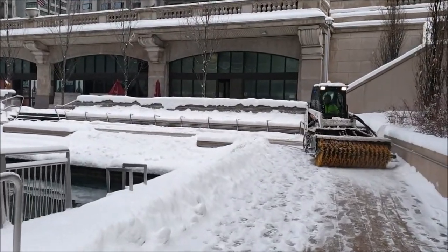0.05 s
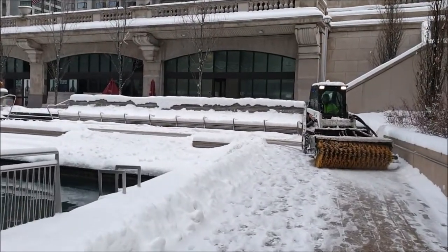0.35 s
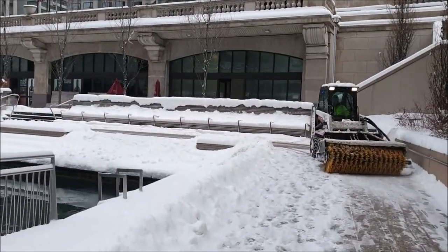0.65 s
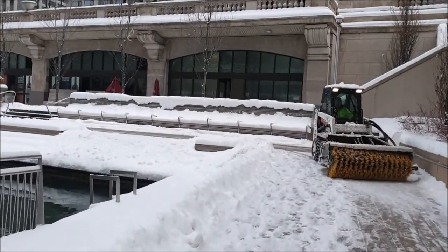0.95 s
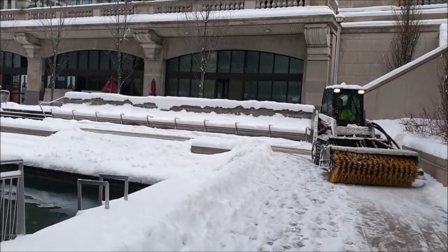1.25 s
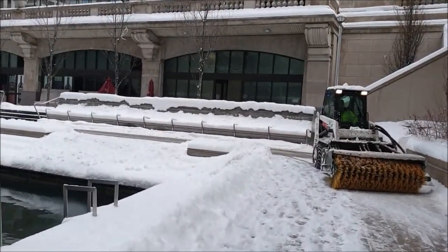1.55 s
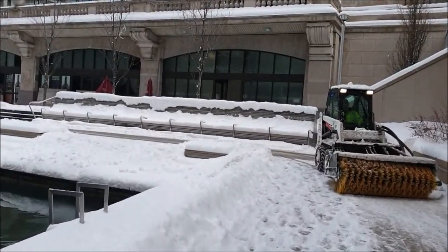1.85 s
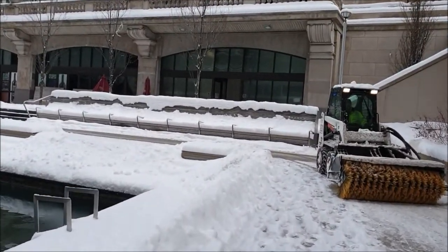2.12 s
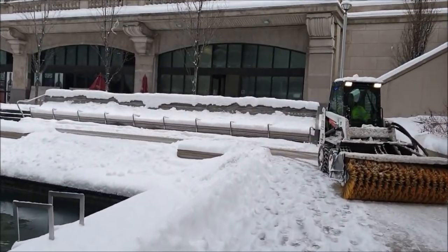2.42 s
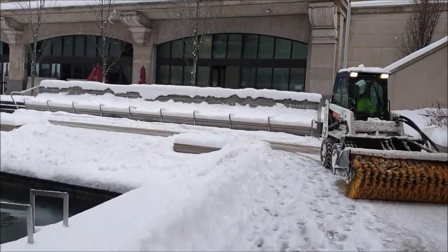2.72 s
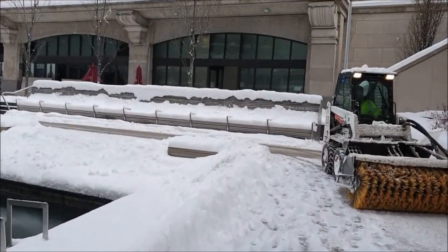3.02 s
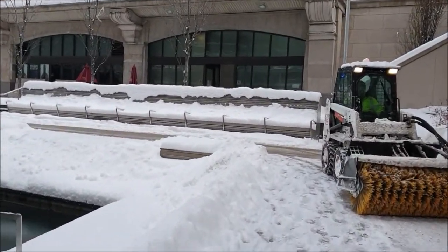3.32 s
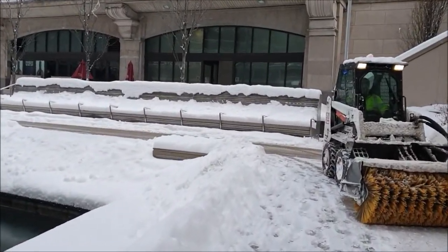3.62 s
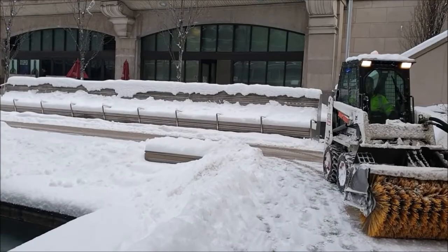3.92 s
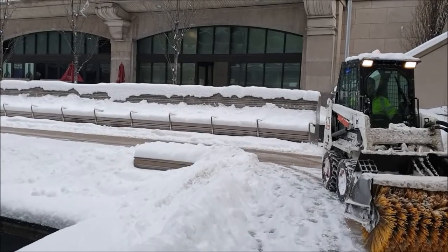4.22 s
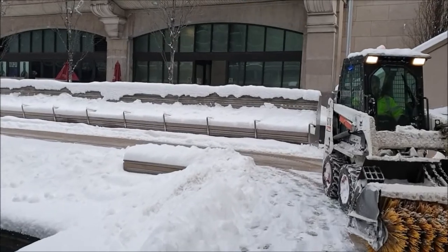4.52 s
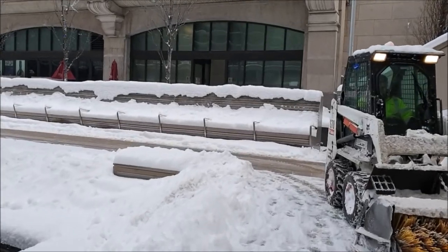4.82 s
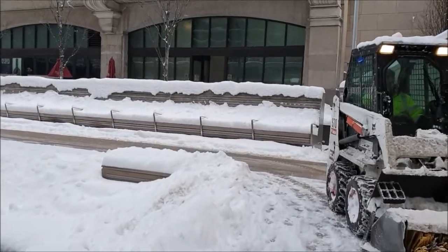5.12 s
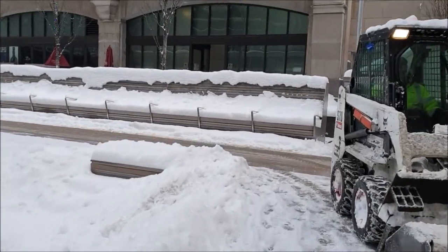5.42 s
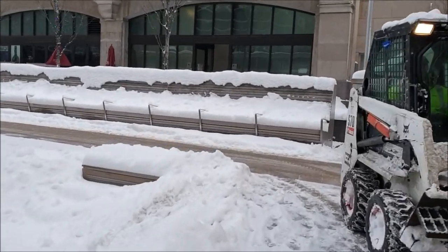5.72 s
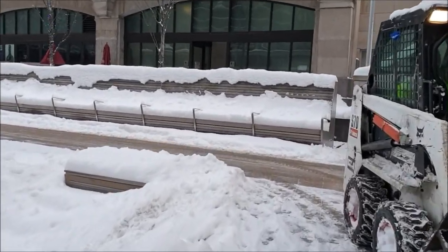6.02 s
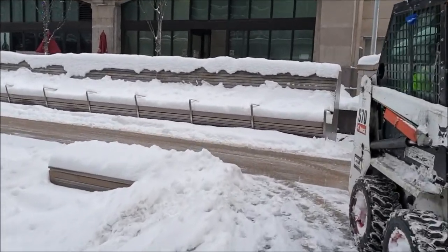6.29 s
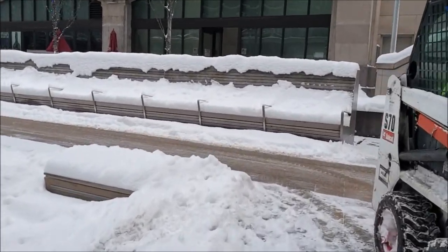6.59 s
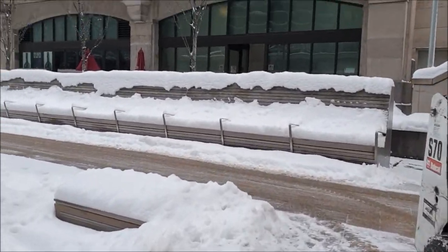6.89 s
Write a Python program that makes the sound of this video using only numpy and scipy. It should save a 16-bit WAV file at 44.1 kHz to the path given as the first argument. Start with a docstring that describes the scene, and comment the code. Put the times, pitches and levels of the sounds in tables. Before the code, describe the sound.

A small diesel loader runs at constant speed on a snowy outdoor walkway, with a low drone, fast knocking clatter and a thin hydraulic whine. Its rotary broom hisses over the paving in uneven surges, flicking bits of grit, and rasps across ice midway. The machine grows gradually louder as it nears the microphone, slightly to the right, and its tyres crunch snow at the end.

```python
"""A diesel drones and clatters, slowly coming closer: a small three-cylinder loader sweeping a snowy walkway.
Firings pulse in the exhaust, one cylinder knocks once a cycle, and a hydraulic pump whines along.
The rotary broom hisses over the paving, flings grit and scrapes ice. Tyres crunch the snow as the
machine draws almost level on the right. A stone front answers the knock."""
import sys
import numpy as np
from scipy import signal
from scipy.fft import rfft, irfft, next_fast_len
from scipy.io import wavfile
from scipy.ndimage import map_coordinates

SR = 44100
rng = np.random.default_rng(int(sys.argv[2]) if len(sys.argv) > 2 else 0)


def store_pcm(level_fs):
    """Save levels as 16-bit WAV."""
    pcm = np.round(np.clip(level_fs, -1, 1) * 32767).astype(np.int16)
    wavfile.write(sys.argv[1], SR, np.atleast_2d(pcm).T)


N = 315315

# the drone swells and fades among the walls: (time [s], firing tone [dB], its octave [dB])
DRONE_LEVELS = [(0.0, -49, -34), (0.04, -33, -29.5), (0.77, -30.5, -26), (1.05, -31.5, -25.5),
                (1.74, -24, -25.5), (2.19, -22, -24.5), (2.89, -21, -24), (3.68, -20, -27),
                (5.04, -18.5, -26), (5.91, -20.5, -27.5), (6.64, -24.5, -19.5), (7.1, -27.5, -17.5)]
# upper drone: (time [s], third harmonic [dB], fourth harmonic [dB])
OVERTONE_LEVELS = [(0.2, -66, -62), (0.25, -71, -64), (0.98, -45, -48), (1.59, -50, -57),
                   (2.11, -44.5, -52), (2.26, -45, -70), (2.83, -44, -49), (3.75, -58, -52.5),
                   (3.79, -62, -64), (4.47, -43, -51), (5.79, -40.5, -61), (6.36, -39.5, -45),
                   (7.01, -47, -52), (7.05, -55, -45)]
# lope of unequal cylinders, between the firing tones: (order [per cycle], level [dB])
LOPE_TONES = [(4, -43.5), (5, -44), (7, -53.5), (8, -73)]
# gas turbulence: (frequency [Hz], relative level [dB])
RUMBLE_EQ = [(12, -9), (28, -12.5), (52, 2.5), (75, 2.5), (150, -0.5), (210, -3.5), (300, -10.5),
             (450, -18.5), (1000, -50)]
def exhaust(cycle):
    """Three firings a cycle make the drone; uneven cylinders and gas turbulence roughen it."""
    firing_db, octave_db = curves(DRONE_LEVELS)
    firing = 3 * cycle
    drone = amp(firing_db) * tone(firing, waver_db=0, drift=.006, rate=10)
    drone += amp(octave_db) * tone(2 * firing, waver_db=-.2, drift=.012, rate=5.9)
    for harmonic, db in zip((3, 4), curves(OVERTONE_LEVELS)):
        drone += amp(db) * tone(harmonic * firing, waver_db=.8, drift=.1, rate=12)
    # the uneven pressure peaks a twelfth of a cycle ahead of a firing
    lope = sum(amp(db) * tone(order * (cycle + 1 / 12), waver_db=.5, drift=.32, rate=5.7)
               for order, db in LOPE_TONES)
    return drone + lope + amp(-37.5) * rush(RUMBLE_EQ)


# low chug, hard clatter and bright valve rattle, each (frequency [Hz], relative level [dB])
BODY_EQ = [(150, -12), (280, -2), (400, -4), (650, 0.5), (850, -2.5), (1100, -14), (1500, -8), (2200, -37),
           (4000, -62)]
CLATTER_EQ = [(600, -29), (1100, 1), (1340, -1.5), (1600, 0.5), (1900, 0), (2350, -6.5), (2950, -7.5),
              (3600, -12.5), (6000, -23), (12000, -45)]
VALVE_EQ = [(1150, -55), (1550, -4), (1900, -8), (2600, 1.5), (3000, -1), (3900, -5), (6000, -17),
            (12000, -44)]
def combustion(cycle):
    """Each firing throws a burst of noise; valves and injectors rattle alike in every cycle."""
    pulse = np.cos(2 * np.pi * 3 * cycle)
    body = carried("body") * rush(BODY_EQ, amp(.54 * pulse))
    clatter = carried("clatter") * rush(CLATTER_EQ, amp(.93 * pulse + wobble(160)))
    pattern = rng.standard_normal(SR // 26)  # about one cycle of noise
    looped = map_coordinates(pattern, [cycle % 1 * len(pattern)], mode="grid-wrap")
    rattle = filtered(looped * amp(1.8 * pulse), lambda hz: amp(along(VALVE_EQ, hz)))
    return body + clatter + carried("valves") * unit(rattle)


# piston-struck block, side panel and loose cover, each (frequency [Hz], width [Hz], relative level [dB])
BLOCK_MODES = [(590, 110, -5.5), (881, 120, 0.5)]
PANEL_MODES = [(862, 34, -1.5), (920, 57, -7), (992.3, 26, 5.5)]
COVER_MODES = [(1317, 146, 1.5), (1430, 160, -3), (2610, 120, -15)]
SLAP_LEAD, PANEL_LEAD, COVER_LAG = 0.0902, 0.1485, 0.038  # against the first firing [cycles]
def cylinder_knock(cycle):
    """One cylinder hits hardest: it slaps the block, rings a side panel and shakes a loose cover."""
    slap = carried("slap") * knocks(cycle + SLAP_LEAD, BLOCK_MODES, scatter_db=1.5, jitter_ms=.2)
    ring = carried("panel") * knocks(cycle + PANEL_LEAD, PANEL_MODES, scatter_db=3.5, jitter_ms=.11)
    shake = carried("cover") * knocks(cycle - COVER_LAG, COVER_MODES, scatter_db=2.2, jitter_ms=1.2)
    return slap + ring + shake


# housing hum: (order [per cycle, played rounded], front level [dB], side level [dB])
HOUSING_TONES = [(13, -69.5, -49), (15, -60.5, -52), (16, -96, -45), (18, -54, -52), (20, -61, -46),
                 (21, -71.5, -44.5), (22, -64, -50), (24, -71.5, -46.5), (25, -67, -48.5), (28, -58, -55),
                 (30, -66, -61), (31, -64, -49), (33, -62, -53), (34, -86, -47), (36, -57, -43.5),
                 (39, -69.5, -70), (40, -85, -59), (44, -63, -60), (45, -60, -67), (51, -57.5, -62),
                 (52, -60.5, -48.5), (54, -76, -56), (59, -69, -53.5), (60, -74, -48), (63.4, -84, -56),
                 (81.5, -69, -50), (100.7, -65.5, -56)]
def housing(cycle, flank):
    """The housing radiates engine orders, differently to the front and to the side."""
    hum = np.zeros(N)
    for order, front_db, side_db in HOUSING_TONES:
        gain = amp(front_db + flank * (side_db - front_db))
        hum += gain * tone(round(order) * cycle + rng.random(), waver_db=2.5, drift=.34, rate=6)
    return hum


# fader ride of the pump whine: (time [s], level [dB])
WHINE_LEVELS = [(0.15, -49), (0.52, -51), (0.59, -48.5), (1.54, -50), (1.62, -42.5), (2.57, -48),
                (4.39, -47.5), (4.43, -42.5), (5.72, -41.5), (6.32, -36.5), (6.98, -44.5), (7.1, -40)]
# the valve whistles louder: (start [s], length [s], level [dB])
WHISTLE_SWELLS = [(6.74, .16, -46.5), (7.08, .12, -46)]
def hydraulics(cycle, flank):
    """The pump whines in step with the engine, a second whine opens to the side, a valve whistles."""
    pump = amp(curves(WHINE_LEVELS)[0]) * tone(27.165 * cycle, waver_db=1.6, drift=.25, rate=18)
    side_whine = amp(-70.5 + 22 * flank) * tone(37.62 * cycle, waver_db=5, drift=.33, rate=15)
    whistle = tone(3427 * np.arange(N) / SR, waver_db=2, drift=.4, rate=40)
    swells = strokes(WHISTLE_SWELLS, attack_s=.08, release_s=.1)
    return pump + side_whine + np.hypot(carried("whistle"), swells) * whistle


# the bristles bite into the paving: (start [s], length [s], level before the hiss and spray trims [dB])
BROOM_BITES = [(0.307, 0.1, -58), (0.597, 0.095, -55.5), (0.82, 0.18, -57.5), (1.127, 0.075, -56),
               (1.357, 0.12, -56), (1.608, 0.087, -54), (1.84, 0.035, -50.5), (2.01, 0.2, -59),
               (2.202, 0.15, -54), (2.35, 0.041, -59), (2.44, 0.17, -54.5), (2.967, 0.14, -58),
               (3.146, 0.2, -57), (3.42, 0.071, -56), (3.747, 0.029, -62), (3.78, 0.197, -54.5),
               (4.008, 0.29, -57.5), (4.31, 0.18, -55.5), (4.601, 0.133, -61), (4.751, 0.13, -55.5),
               (4.952, 0.21, -53.5)]
# bristle hiss and icy sizzle, each (frequency [Hz], relative level [dB])
BRISTLE_EQ = [(2000, -4), (5000, 0), (7500, -0.5), (9200, -1.5), (11500, 1.5), (13500, -1.5), (15500, -13)]
SPRAY_EQ = [(4000, -24), (8000, -4), (11000, 3), (14000, 7), (15500, 8)]
# flung grit: (time [s], peak level [dB])
GRIT_TICKS = [(0.1042, -42), (0.8056, -46), (1.1348, -43), (1.7943, -37), (1.8457, -43), (2.0527, -39),
              (2.3984, -43), (3.845, -40), (4.1525, -41), (4.9691, -42)]
HISS_TRIM_DB, SPRAY_TRIM_DB = 1.5, -3
GRIT_CREST_DB, GRIT_T60_S = 4, 0.014  # a tick's peak over its noise; its decay
def broom():
    """Bristles scrub the paving in surges, throw a crackling spray of ice and fling bits of grit."""
    bites = strokes(BROOM_BITES, attack_s=.061, release_s=.077)
    flutter = amp(wobble(24))
    scrub = np.hypot(carried("bristles"), bites) * flutter
    roughness = amp(1.25 * wobble(120) + 2.3 * wobble(1500))
    hiss = amp(HISS_TRIM_DB) * scrub * rush(BRISTLE_EQ, roughness)
    crystals = rng.random(N) < 700 / SR  # about 700 a second
    spray = amp(SPRAY_TRIM_DB) * scrub * rush(SPRAY_EQ, crystals)
    t = np.arange(SR // 20) / SR
    ticks = np.zeros(N + SR)
    for start, db in GRIT_TICKS:
        ticks[round(start * SR):][:len(t)] += amp(db - GRIT_CREST_DB - 60 * t / GRIT_T60_S)
    return hiss + spray + ticks[:N] * rush(BRISTLE_EQ)


# ring of the broom hood: (frequency [Hz], width [Hz], relative level [dB])
HOOD_MODES = [(2577, 220, 5.5), (2730, 59, 1), (3275, 45, 6)]
def hood():
    """The bristles keep the hood ringing."""
    return carried("hood") * ringing(HOOD_MODES)


# strokes over ice: (start [s], length [s], level [dB])
ICE_STROKES = [(3.25, 0.039, -43), (3.85, 1.3, -53.5)]
# their midrange rasp: (frequency [Hz], relative level [dB])
ICE_EQ = [(1200, -35), (1650, 5), (2150, 5), (2500, -19), (4000, -42)]
def ice_scrape():
    """Midway the broom catches a patch of ice: a short scuff, then a longer rasp."""
    return strokes(ICE_STROKES, attack_s=.14, release_s=.23) * rush(ICE_EQ, amp(1.6 * wobble(77)))


# crisp snow: (frequency [Hz], relative level [dB])
CRUNCH_EQ = [(1200, -35), (2500, -10), (3200, 7), (4000, -5.5), (5000, -3), (6000, -15), (7200, -4.5),
             (9000, -9.5), (15000, -28)]
# steel frame rung by snow and grit: (frequency [Hz], width [Hz], relative level [dB])
FRAME_MODES = [(3830, 220, 1), (4440, 160, 0.5), (4950, 190, 0.5), (5980, 650, -3)]
def tyres():
    """Packed snow breaks under the treads in fine grains that ring the frame; near wheels emerge last."""
    gain = np.hypot(carried("treads"), carried("near treads"))
    grains = amp(1.8 * wobble(900) + .4 * wobble(25))
    return gain * (amp(4.5) * rush(CRUNCH_EQ, grains) + amp(1) * ringing(FRAME_MODES, grains))


# reverb of the stone front: (frequency [Hz], time to fall 60 dB [s])
FACADE_DECAY = [(200, 1), (2000, 0.74), (10000, 0.21)]
def facade(x):
    """The stone front's answer, different at each ear, dies fastest in the treble."""
    hz, t, noise = signal.stft(rng.standard_normal((2, SR // 2)), SR, nperseg=256)
    decay = amp(-60 * t / along(FACADE_DECAY, hz)[:, None])
    tail = signal.istft(noise * decay, SR, nperseg=256)[1]
    return signal.fftconvolve(x[None], tail / np.linalg.norm(tail[0]), axes=1)[:, :N]


DRIVE_M_PER_S, CLOSEST_M, CLOSEST_S = 1.957, 2.92, 7.535  # a straight, steady drive
def ahead():
    """Metres that the machine still has to drive until it is abeam."""
    return DRIVE_M_PER_S * (CLOSEST_S - np.arange(N) / SR)


def nearness():
    """Closest distance over present distance."""
    return CLOSEST_M / np.hypot(ahead(), CLOSEST_M)


# how each part carries: (gain when closest [dB], loss per doubling of distance [dB])
FALLOFF = {"body": (-37.5, 5.3), "slap": (-40.5, 8.2), "panel": (-38, 9.7), "clatter": (-41.5, 5.04),
           "valves": (-45.5, 6.6), "cover": (-54.5, .3), "whistle": (-51.5, 6.8), "hood": (-51, 4.1),
           "bristles": (-53, 4.3), "treads": (-58, 2.45), "near treads": (-49.5, 26)}
def carried(part):
    """Gain of one part as the machine approaches; shielded parts lose most with distance."""
    closest_db, loss_db = FALLOFF[part]
    return amp(closest_db + loss_db * np.log2(nearness()))


def tone(turns, waver_db, drift, rate):
    """A sine of rms 1 whose level and phase (drift, in radians) waver at rate knots a second."""
    level = amp(waver_db * wobble(rate))
    return unit(level * np.cos(2 * np.pi * turns + drift * wobble(rate)))


# stereo image of the noise: (frequency [Hz], left-right likeness [0 to 1])
STEREO_LIKENESS = [(100, 1), (500, 0.68), (1000, 0.87), (2500, 0.27), (5000, 0.64), (10000, 0.1)]
def rush(spectrum, gate=1):
    """Stereo noise of rms 1, gated and then coloured; centred in the bass, widest at the top."""
    def colour(hz):
        spread = np.arccos(np.clip(along(STEREO_LIKENESS, hz), -1, 1)) / 2
        return amp(along(spectrum, hz)) * [np.cos(spread), np.sin(spread)]
    mid, side = filtered(gate * rng.standard_normal((2, N)), colour)
    return unit(np.array([mid + side, mid - side]))


def knocks(cycle, modes, scatter_db, jitter_ms):
    """One blow a cycle, uneven in size and timing, rings a set of modes; rms 1."""
    onsets = np.flatnonzero(np.diff(np.floor(cycle)))
    size, late = rng.standard_normal((len(onsets), 2)).T
    onsets += np.round(late * jitter_ms * SR / 1000).astype(int)
    blows = np.zeros(N)
    blows[np.clip(onsets, 0, N - 1)] = amp(scatter_db * size)
    return unit(filtered(blows, lambda hz: resonances(modes, hz)))


def ringing(modes, gate=1):
    """Stereo noise of rms 1, gated and then rung through a set of modes."""
    return unit(filtered(gate * rng.standard_normal((2, N)), lambda hz: resonances(modes, hz)))


def resonances(modes, hz):
    """Causal response of band-pass modes of alternating polarity."""
    return sum((-1) ** k * amp(db) * 1j * hz * width / (centre ** 2 - hz ** 2 + 1j * hz * width)
               for k, (centre, width, db) in enumerate(modes))


def strokes(rows, attack_s, release_s):
    """Attack, hold and release for each row; the ramps are centred on its ends."""
    t = np.arange(N) / SR
    envelope = np.zeros(N)
    for start, length, db in rows:
        ramp = .5 + np.minimum((t - start) / attack_s, (start + length - t) / release_s)
        envelope = np.maximum(envelope, amp(db) * np.clip(ramp, 0, 1))
    return envelope


def amp(db):
    """Decibels to gain."""
    return 10 ** (np.asarray(db) / 20)


def unit(x):
    """Scale to rms 1."""
    return x / np.sqrt(np.mean(x ** 2) + 1e-20)


def along(points, hz):
    """Interpolate (frequency [Hz], value) points on a log axis."""
    freqs, values = np.transpose(points)
    return np.interp(np.log(hz + 1), np.log(freqs + 1), values)


def curves(rows):
    """One value per sample for each column after the time."""
    times, *columns = np.transpose(rows)
    return [np.interp(np.arange(N) / SR, times, column) for column in columns]


def wobble(rate):
    """A smooth random curve, rate knots a second."""
    return map_coordinates(rng.standard_normal(int(N * rate / SR) + 4), [np.arange(N) * rate / SR])


def filtered(x, response):
    """Filter x by a complex response of frequency."""
    size = next_fast_len(N + SR // 2)
    return irfft(rfft(x, size) * response(np.fft.rfftfreq(size, 1 / SR)), size)[..., :N]


# steady throttle, last value held: (time [s], engine speed [cycles/s])
ENGINE_SPEED = [(0, 25.96), (2.1, 26.035)]
# pan: (frequency [Hz], right over left [dB])
EAR_BALANCE = [(80, 3), (160, 2), (600, 2.5), (1200, 1.6), (4000, 1), (12000, 1)]
FLANK_AHEAD_M, FLANK_BLUR_M = 5.14, 1.95  # the open flank comes into view this far ahead, this gradually
LAG_AHEAD_MS, LAG_ABEAM_MS = 0.054, 0.22  # delay of the left ear
def scene():
    """The machine nears on the right, showing its flank: the left ear hears it later and softer."""
    cycle = np.cumsum(curves(ENGINE_SPEED)[0]) / SR
    flank = 1 / (1 + np.exp((ahead() - FLANK_AHEAD_M) / FLANK_BLUR_M))  # 0 head-on, 1 side-on
    knock = cylinder_knock(cycle)
    engine = exhaust(cycle) + combustion(cycle) + housing(cycle, flank) + knock
    left, right = engine + hydraulics(cycle, flank) + broom() + hood() + ice_scrape() + tyres()
    lag_ms = LAG_AHEAD_MS + (LAG_ABEAM_MS - LAG_AHEAD_MS) * nearness()
    left = map_coordinates(left, [np.arange(N) - lag_ms * SR / 1000], order=5)
    direct = filtered(np.array([left, right]), lambda hz: amp(np.outer([-.5, .5], along(EAR_BALANCE, hz))))
    return direct + amp(-7.5) * facade(knock)


TOP_HZ = 15750
def record(dry):
    """A brick-wall low-pass takes off the highest air."""
    return filtered(dry, lambda hz: hz < TOP_HZ)


dry = scene()
out = record(dry)
store_pcm(out)
```